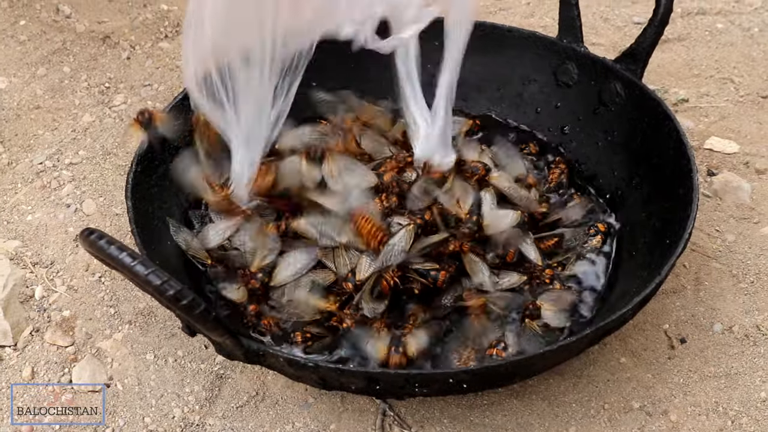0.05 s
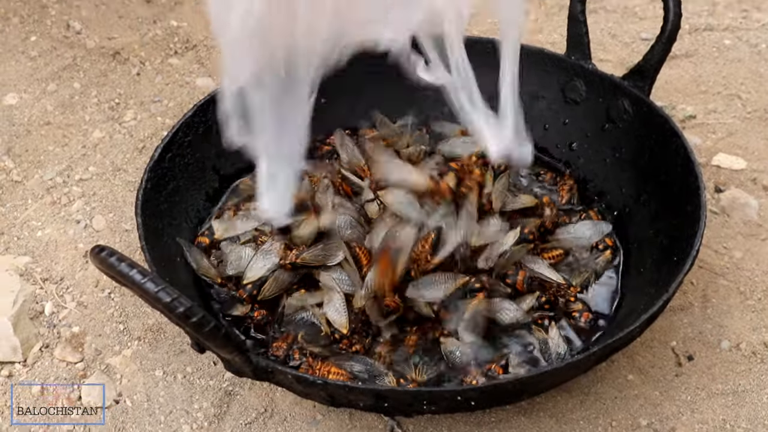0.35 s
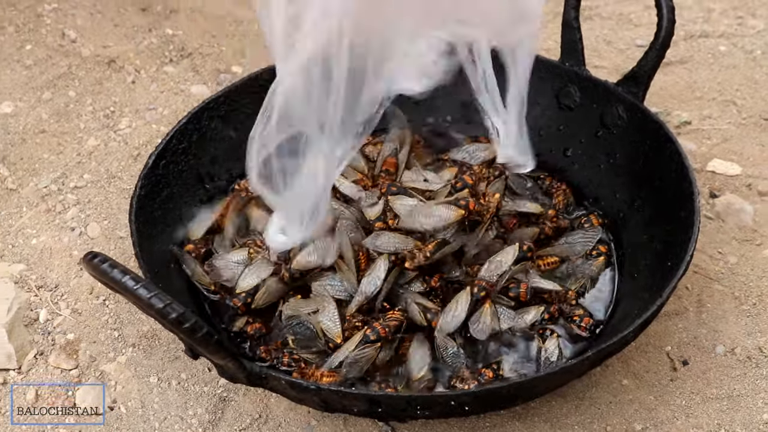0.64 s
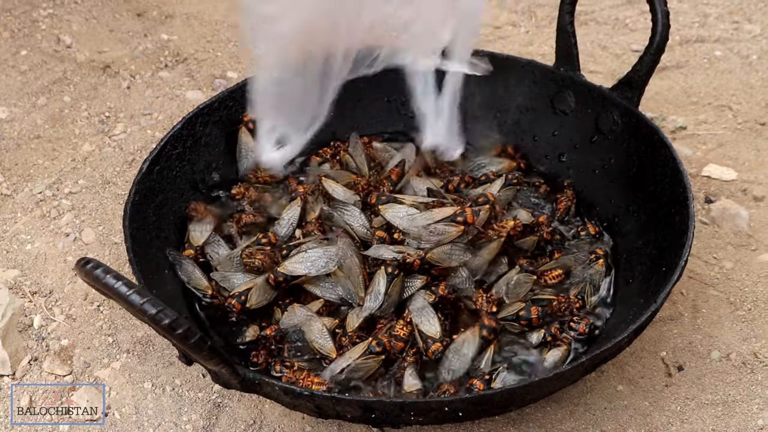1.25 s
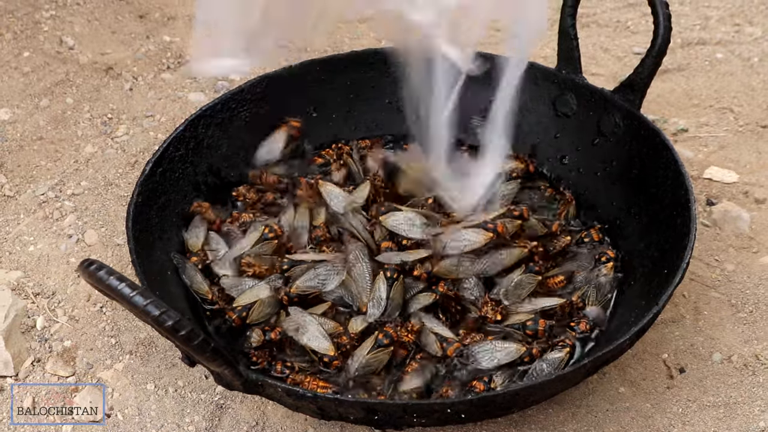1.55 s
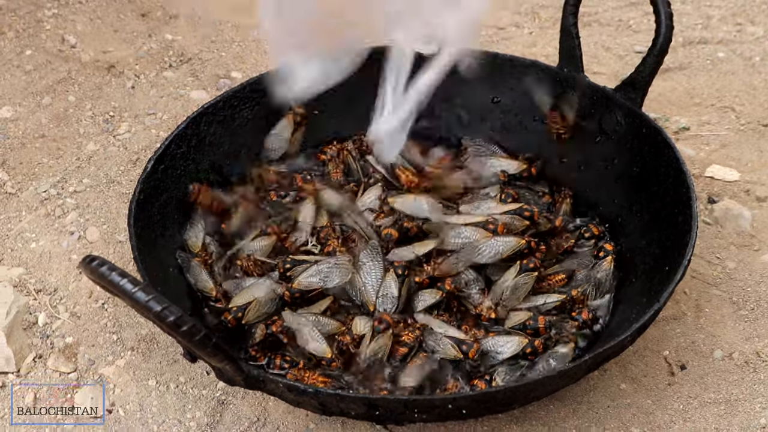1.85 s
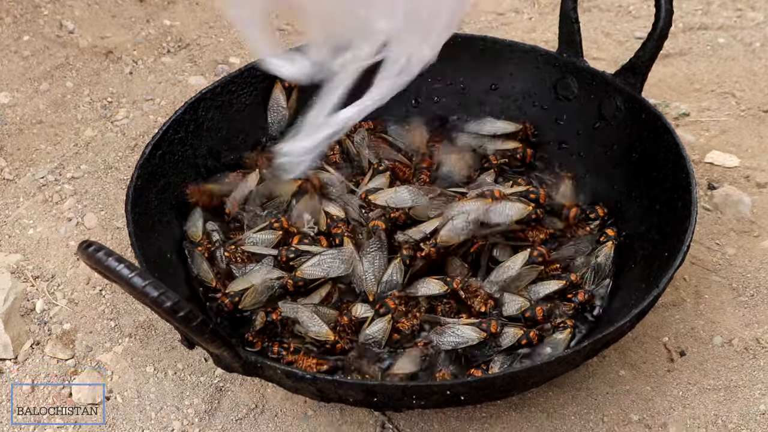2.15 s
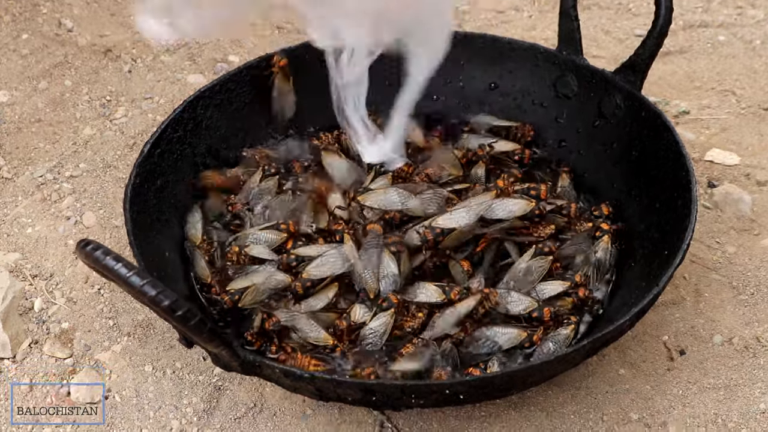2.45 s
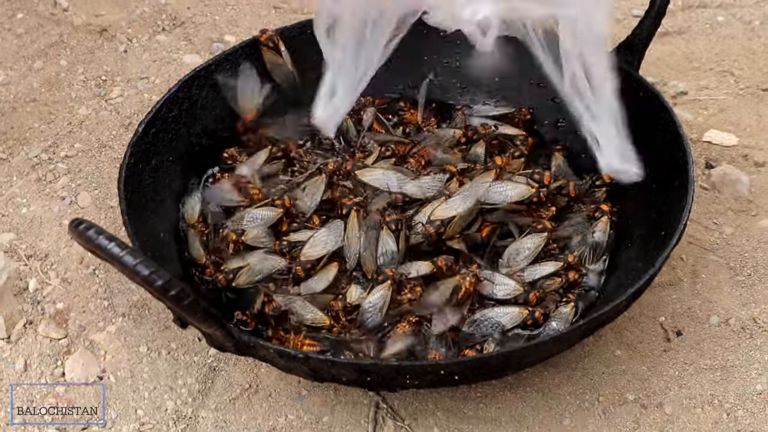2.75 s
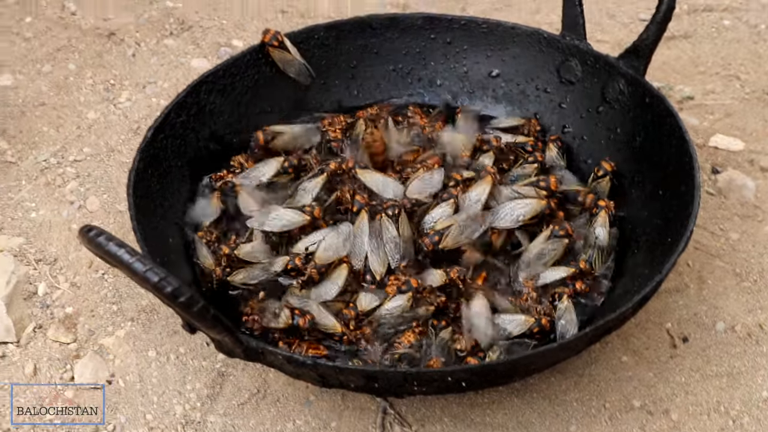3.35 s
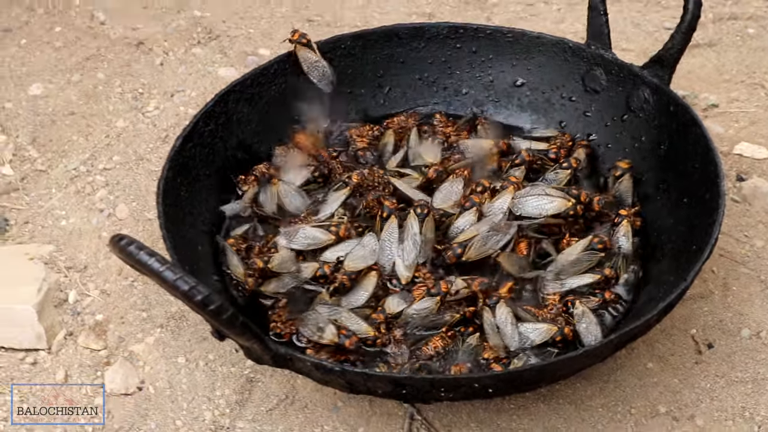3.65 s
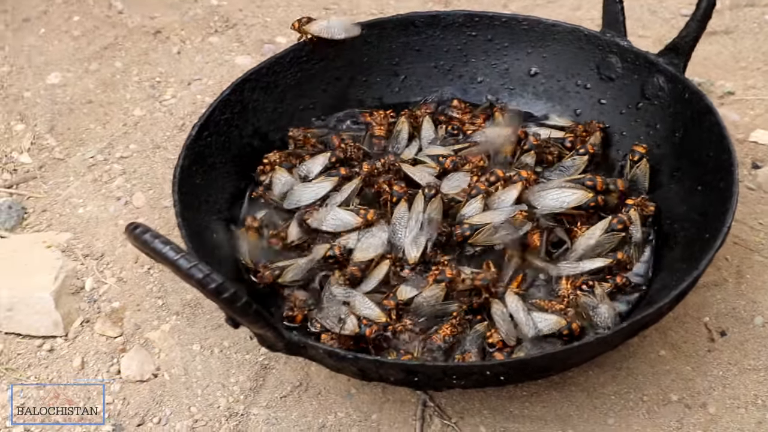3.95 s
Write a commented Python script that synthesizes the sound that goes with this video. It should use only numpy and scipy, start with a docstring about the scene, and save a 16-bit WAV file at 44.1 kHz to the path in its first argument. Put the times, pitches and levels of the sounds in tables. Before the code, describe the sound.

A dense, high, hissing buzz of cicadas outdoors, with a faint bag rustle.

```python
"""A heap of live cicadas buzzes in an iron pan outdoors. Each snaps two tymbals in turn, every snap a
short falling chirp. At first the crowd blurs into a hiss, with ringing calls on top and legs tapping
the pan. More are shaken out of a thin bag, which rustles most from 1.5 to 2.2 s. From 2 s a little
wind touches the microphone. Then the buzz turns hollow and the crowd thins, until in the last second
single rasping voices stand out."""
import sys
import numpy as np
from scipy import signal
from scipy.fft import rfft, irfft
from scipy.io import wavfile
from scipy.ndimage import uniform_filter1d

SR = 44100
rng = np.random.default_rng(int(sys.argv[2]) if len(sys.argv) > 2 else 0)


def materialize(psi):
    """Save the field psi as 16-bit PCM at rate SR to the path in sys.argv[1].

    A 1-D psi becomes a single channel; in a 2-D psi each row is a channel.
    """
    bounded = np.clip(np.atleast_2d(psi).T, -1, 1)
    quanta = np.round(bounded * 32767).astype(np.int16)
    wavfile.write(sys.argv[1], SR, quanta)


N = 176400

# The crowd's fader. Each row: time in seconds, level in dB, treble boost in dB.
CROWD_FADER = [(0, -34.5, 1), (.2, -35.5, 1), (.3, -32.5, 1), (.45, -31.5, 1), (.6, -33, 0),
               (.74, -31, -0.5), (.82, -33.5, 1.5), (1.05, -33, 2), (1.35, -32.5, 1), (1.48, -33.5, 2.5),
               (1.6, -34, 0.5), (1.71, -34.5, 4), (1.78, -32.5, 1), (1.87, -34, 1), (2.12, -33, 1.5),
               (2.22, -34, 0), (2.36, -33.5, -3.5), (2.45, -37, -2), (2.6, -35.5, 0), (2.76, -39, 1.5),
               (2.95, -38, -2), (3.08, -41, 5), (3.19, -46, -0.5), (3.27, -46.5, 7), (3.32, -41.5, -3),
               (3.38, -41.5, -1), (3.435, -43, -3), (3.48, -38.5, -3), (3.63, -38, 0), (3.73, -40.5, -2),
               (3.85, -40.5, -0.5), (4, -45.5, 3.5)]
# The crowd's bright hiss. Each row: frequency in Hz, gain in dB.
CROWD_EQ = [(300, -68), (1500, -33), (2500, -27.5), (2950, -20.5), (3350, -12), (3700, -9.5), (4150, -4.5),
            (4700, -2), (5400, -3), (6050, -5), (7000, -8), (8600, -10.5), (9500, -15.5), (10700, -24.5),
            (13500, -27), (15700, -40.5)]
# The fizz at the very top of the crowd. Each row: time in seconds, level in dB.
FIZZ_FADER = [(0, -54.5), (.95, -53.5), (1.3, -52), (2.6, -54.5), (2.82, -60.5), (3.0, -59), (3.45, -62.5),
              (4, -63)]


def crowd(count=11, rate_hz=67, top_hz=9573, end_hz=3831, restless_db=2.5, steady_s=0.098):
    """Many buried insects, each at its own rate and pitch; as one fades the others fill in."""
    buzz = np.zeros(N)
    for pace, tuning, imbalance, lag_s in rng.uniform(-1, 1, (count, 4)):
        pitch = 1 + 0.1326 * tuning
        snap = chirp(top_hz * pitch, end_hz * pitch)
        voice = tymbals(N, rate_hz * (1 + .06 * pace), -9 * abs(imbalance), snap, rough=1.0, wander=.02)
        voice = iron_pan(voice, echo_db=-7)
        buzz += np.roll(voice, int(lag_s * SR)) * amp(restless_db * drift(N, hz=18))
    buzz = coloured(flattened(buzz), CROWD_EQ)
    buzz /= np.sqrt(uniform_filter1d(buzz ** 2, int(steady_s * SR)))  # level it ahead of the fader
    highs = filtered(buzz, "high", hz=5570, order=3)
    fizz = filtered(buzz, "high", hz=10120, order=8)
    body = buzz - highs
    treble = (highs - fizz) * amp(curve(CROWD_FADER, column=2))
    return amp(curve(CROWD_FADER)) * (body + treble) + amp(curve(FIZZ_FADER)) * unit(fizz)


# Close rasps. Each row: start in seconds, length in seconds, level in dB, snap rate of one tymbal in Hz,
# top of the chirp in Hz, pitch it falls toward in Hz, second tymbal against the first in dB.
RASP_CUES = [ (0.061, 0.25, -41.5, 68, 7430, 4130, -18), (2.37, .11, -42, 63, 6250, 4210, -17),
             (2.495, .27, -43.5, 63, 8380, 4010, -13), (2.805, .278, -39, 70, 9500, 4200, 0),
             (3.102, .006, -39, 68, 8000, 4200, 0), (3.117, .06, -37.2, 70, 9800, 4100, 0),
             (3.196, .02, -39.2, 68, 9500, 4700, 0), (3.235, .064, -41, 72, 9500, 4000, -1),
             (3.3135, .117, -40, 71.5, 10500, 3600, -16), (3.451, .052, -38.5, 71.5, 9500, 3500, -11),
             (3.509, 0.08, -35.3, 71.5, 9400, 4900, -14), (3.592, 0.073, -38, 70.5, 9960, 3900, -11),
             (3.679, 0.4, -46.5, 68, 10500, 3900, -9)]
# The bite of a close rasp. Each row: frequency in Hz, gain in dB.
RASP_EQ = [(500, -45), (2400, -14), (3400, 1.5), (4400, 6), (5300, -5.5), (6150, 2.5), (7200, 1), (9000, 4),
           (10500, -8.5), (15000, -21)]


def rasping_cicadas():
    """Insects on top of the heap whose snaps sweep down a wide band."""
    out = np.zeros(N)
    for start, length, db, rate_hz, top_hz, end_hz, second_db in RASP_CUES:
        snap = chirp(top_hz, end_hz)
        add(out, start, call(length, db, rate_hz, second_db, snap, RASP_EQ, rough=.55))
    return out


# Ringing calls. Each row: start in seconds, length in seconds, level in dB, snap rate of one tymbal in
# Hz, ring pitch in Hz, fall below that pitch as a fraction, second tymbal against the first in dB.
RING_CUES = [(0.02, .25, -41.5, 66.3, 5340, .15, -4), (0.281, .33, -39, 65.7, 5320, .15, -3),
             (0.65, 0.11, -37, 65.7, 5320, .12, -11), (.52, 0.24, -40.5, 67.7, 4830, .15, -9),
             (0.84, 0.1, -38.5, 65, 4780, .1, -2), (0.935, 0.65, -36.3, 64.6, 4940, .16, -7),
             (1.315, 0.2, -38.5, 63.5, 5320, .15, 0), (1.62, 0.12, -36, 63.4, 4886, .14, -1),
             (1.65, 0.08, -36.5, 62.4, 5380, .13, -1), (1.75, .1, -40.5, 63, 5030, .12, -1),
             (1.93, 0.44, -39, 65.35, 4840, .15, -8), (1.94, 0.39, -41, 62.6, 5230, .13, -2),
             (2.474, 0.29, -42, 64, 5370, .095, 3), (2.769, 0.86, -44, 63.6, 5340, .095, 7),
             (3.633, .38, -41.5, 63.2, 5370, .095, 0.5)]
# The band the abdomen passes. Each row: multiple of the ring pitch, gain in dB.
ABDOMEN_EQ = [(.1, -50), (.5, -24), (.87, -5), (1, 0), (1.12, -6), (1.7, -14), (3, -30)]


def ringing_cicadas():
    """Close insects whose narrow chirps ring on the abdomen's resonance."""
    out = np.zeros(N)
    for start, length, db, rate_hz, ring_hz, fall, second_db in RING_CUES:
        snap = chirp(ring_hz * (1 + fall * 0.598), ring_hz * (1 - fall), length_s=0.0094, sweep_s=0.00926)
        abdomen = [(ring_hz * ratio, gain_db) for ratio, gain_db in ABDOMEN_EQ]
        add(out, start, call(length, db, rate_hz, second_db, snap, abdomen, rough=.5))
    return out


def call(length, db, rate_hz, second_db, snap, eq, rough, release_s=0.0068):
    """One close insect starts, holds with a slight waver and stops."""
    t = np.arange(0, length + release_s, 1 / SR)
    gate = np.clip(np.minimum(2 * t, t[-1] - t) / release_s, 0, 1)
    buzz = tymbals(len(t), rate_hz, second_db, snap, rough)
    voice = coloured(iron_pan(buzz, echo_db=-11), eq)
    return amp(db + 0.27 * drift(len(t), hz=9.5)) * gate * unit(voice)


def tymbals(n, rate_hz, second_db, snap, rough, wander=.006, jitter_s=.0002, spread_db=1.7):
    """Two tymbals snap in turn, slightly unevenly; each snap carries a puff of noise."""
    waves, swell = snap
    chances = rng.standard_normal((900, 2))
    variants = rng.integers(0, len(waves), 900)
    turns = np.cumsum(2 * rate_hz * (1 + wander * drift(n, hz=7))) / SR
    times = np.flatnonzero(np.diff(np.floor(turns), prepend=-1) > 0) / SR  # one snap per whole turn
    tone, puffs = np.zeros((2, n))
    for k, (start, (late, size), variant) in enumerate(zip(times, chances, variants)):
        gain = amp(spread_db * size + second_db * (k % 2))
        add(tone, start + late * jitter_s, gain * waves[variant])
        add(puffs, start + late * jitter_s, gain * swell)
    noise = puffs * rng.standard_normal(N)[:n]
    return unit(unit(tone) + rough * unit(noise))


def chirp(top_hz, end_hz, length_s=0.0081, sweep_s=.0035):
    """A snap falls in pitch as rib after rib buckles. Gives six detuned variants and their envelope."""
    t = np.arange(0, length_s, 1 / SR)
    detune = np.linspace(.96, 1.04, 6)[:, None]
    hz = (end_hz + (top_hz - end_hz) * np.exp(-t / sweep_s)) * detune
    swell = np.sin(np.pi * (t / length_s) ** 1.114) ** 1.07  # builds more slowly than it stops
    cycles = np.cumsum(hz, 1) / SR + rng.random()
    return swell * np.sin(2 * np.pi * cycles), swell


def iron_pan(x, echo_db, count=40, t60_s=0.032):
    """Quick reflections between the iron walls, different for every place in the heap."""
    delay_s = rng.uniform(.0004, .012, count)
    sign = rng.choice([-1, 1], count)
    taps = np.zeros(SR // 20)
    taps[(delay_s * SR).astype(int)] = sign * amp(-60 * delay_s / t60_s)
    taps *= amp(echo_db) / np.linalg.norm(taps)
    taps[0] = 1  # the direct sound
    return signal.oaconvolve(x, taps / np.linalg.norm(taps))[:len(x)]


# A scoop in the buzz. Each row: time in seconds, gain of the scooped band in dB.
HOLLOW_FADER = [(2.15, -0.5), (2.35, -4.5), (2.6, -2), (2.76, -10), (2.9, -5.5), (3.3, -4), (3.46, -10),
                (3.53, -5), (3.6, -11.5), (3.7, -7), (4, -7)]


def hollowed(buzz, centre_hz=6170, width_hz=580):
    """The buzz turns hollow as a narrow band just above its ring dips."""
    band = filtered(buzz, "band", hz=[centre_hz - width_hz / 2, centre_hz + width_hz / 2], order=2)
    return buzz + band * (amp(curve(HOLLOW_FADER)) - 1)


# The bag's running rustle. Each row: time in seconds, level in dB.
RUSTLE_FADER = [(0, -58), (.6, -70), (.8, -58.5), (.95, -70), (1.7, -55.5), (2.15, -59.5), (2.6, -63),
                (3.85, -75.5)]
# Single scrapes of the bag. Each row: start in seconds, length in seconds, level in dB.
SCRAPE_CUES = [(0.055, .06, -54), (1.482, 0.051, -53.5), (1.594, .06, -53.5), (1.677, 0.085, -52.5),
               (1.764, 0.039, -53), (1.798, 0.024, -52), (1.852, 0.057, -53), (1.94, 0.055, -52.5),
               (2.01, 0.098, -53.5), (2.101, 0.068, -55), (2.373, .065, -56), (3.913, .1, -59)]
# The tone of the thin bag. Each row: frequency in Hz, gain in dB.
BAG_EQ = [(100, -1.5), (300, -1.5), (650, 5.5), (1300, 7), (2300, 7), (5000, -7), (13000, -33),
          (16000, 1.5)]


def bag():
    """Dense soft crinkles that swell with each scrape as the bag is shaken empty."""
    rubbing = amp(curve(RUSTLE_FADER))
    scraping = np.zeros(N)
    for start, length, db in SCRAPE_CUES:
        arch = np.sin(np.pi * np.arange(0, length, 1 / SR) / length).clip(0)
        add(scraping, start, amp(db) * np.sqrt(arch))
    crinkles = coloured(ticks(per_s=4500, spread_db=1.7), BAG_EQ)
    return np.hypot(rubbing, scraping) * unit(crinkles)


# The hollow ring of the tapped pan. Each row: frequency in Hz, gain in dB.
PAN_EQ = [(300, -32), (800, -11), (1050, -5.5), (1220, 0), (1480, -11), (2000, -17), (4000, -25.5)]


def scrabble(start_db=-65, fade_db_per_s=1.9):
    """Legs and wings tap against the pan as the heap slowly settles."""
    taps = coloured(ticks(per_s=1300), PAN_EQ)
    return amp(start_db - fade_db_per_s * np.arange(N) / SR) * unit(taps)


# The gusts. Each row: time in seconds, level in dB.
WIND_FADER = [(1.1, -82), (1.26, -68), (1.44, -75.5), (2.02, -57.5), (2.04, -51.5), (2.49, -63.5),
              (2.53, -55), (2.71, -63), (2.82, -47.5), (3.01, -47), (3.09, -53.5), (3.42, -69.5),
              (4.0, -75)]
# The wind's deep rumble. Each row: frequency in Hz, gain in dB.
WIND_EQ = [(8.8, -53), (15, 4), (41, -3.5), (237, -26.5), (300, -33.5), (520, -35), (900, -52),
           (3000, -100)]
# The open-air bed. Each row: frequency in Hz, gain in dB.
AIR_EQ = [(20, -2), (120, 0.5), (300, 0), (520, -2), (800, -1), (1300, 5.5), (2200, -6), (5000, -10),
          (16000, -29)]


def outdoors(air_db=-66.5):
    """Low gusts on the microphone over a quiet bed of open air."""
    wind = amp(curve(WIND_FADER)) * unit(coloured(rng.standard_normal(N), WIND_EQ))
    air = amp(air_db) * unit(coloured(rng.standard_normal(N), AIR_EQ))
    return wind + air


def ticks(per_s, spread_db=0.0):
    """Random small clicks of uneven size; spread_db adds random accents."""
    clicks = (rng.random(N) < per_s / SR) * rng.standard_normal(N)
    return clicks * amp(spread_db * np.minimum(rng.exponential(1, N), 3))


def drift(n, hz):
    """A slow random wobble with a spread of about 1."""
    knots = rng.standard_normal(400)
    return np.interp(np.arange(n) / SR * hz, np.arange(len(knots)), knots)


def coloured(x, eq):
    """Applies an EQ curve of (Hz, dB) points."""
    points_hz, db = np.transpose(eq)
    hz = np.fft.rfftfreq(len(x), 1 / SR)
    gain = amp(np.interp(np.log(hz + 1), np.log(points_hz + 1), db))
    return irfft(rfft(x) * gain, len(x))


def flattened(x, bins=1200):
    """Evens out the long-term spectrum and keeps the pulses."""
    spectrum = rfft(x)
    power = abs(uniform_filter1d(abs(spectrum) ** 2, bins))
    return irfft(spectrum / np.sqrt(power + 1e-9), len(x))


def filtered(x, kind, hz, order):
    """A filter run both ways, so the band stays in phase."""
    return signal.sosfiltfilt(signal.butter(order, hz, kind, fs=SR, output="sos"), x)


def amp(db):
    """Decibels to gain."""
    return 10 ** (np.asarray(db) / 20)


def unit(x):
    """Scales to rms 1."""
    return x / np.sqrt(np.mean(x ** 2) + 1e-20)


def curve(table, column=1):
    """One column of a fader table, for every sample."""
    table = np.array(table)
    return np.interp(np.arange(N) / SR, table[:, 0], table[:, column])


def add(mix, start_s, sound):
    """Mixes a sound in at its start time."""
    part = mix[max(round(start_s * SR), 0):][:len(sound)]
    part += sound[:len(part)]


def scene():
    """Cicadas in front, pan, bag and open air behind, alike in both channels."""
    cicadas = hollowed(crowd() + rasping_cicadas() + ringing_cicadas())
    mono = cicadas + scrabble() + bag() + outdoors()
    return np.array([mono, mono])


def record(dry):
    """A steep high cut at 15750 Hz."""
    high_cut = signal.firwin(511, 15750, window=("kaiser", 9), fs=SR)
    return signal.oaconvolve(dry, high_cut[None], "same")


dry = scene()
out = record(dry)
materialize(out)
```